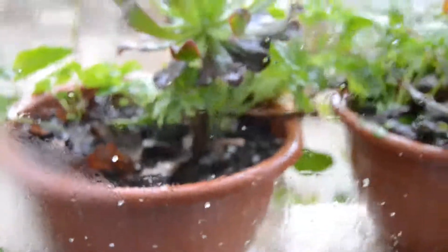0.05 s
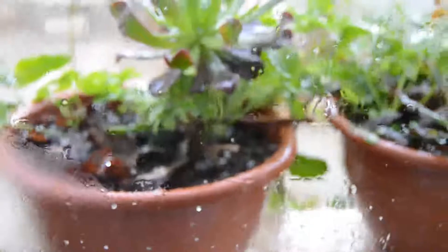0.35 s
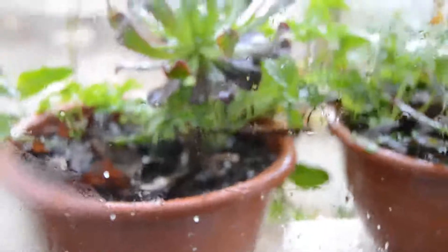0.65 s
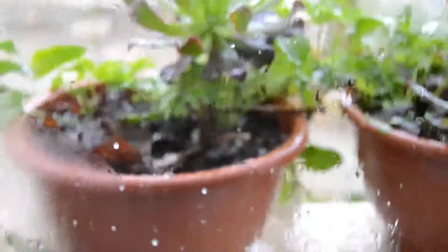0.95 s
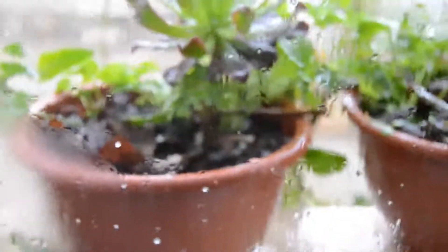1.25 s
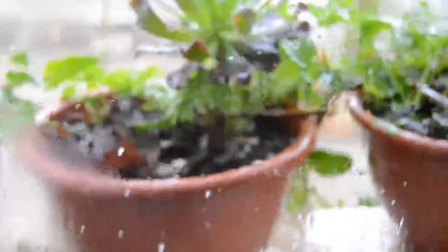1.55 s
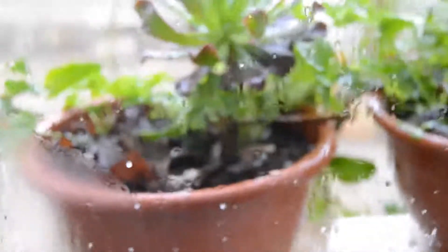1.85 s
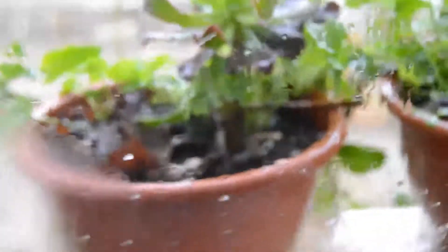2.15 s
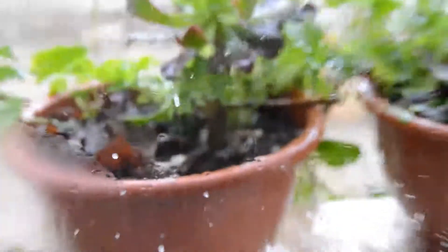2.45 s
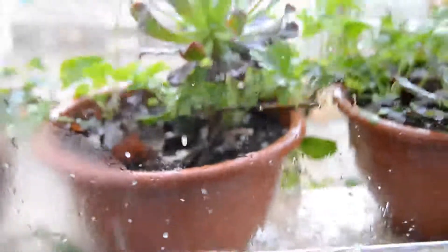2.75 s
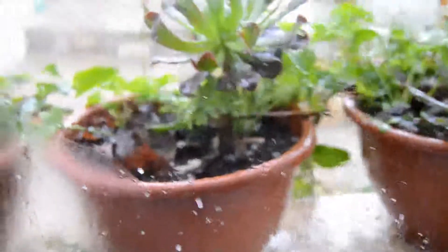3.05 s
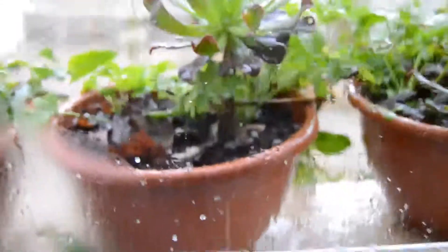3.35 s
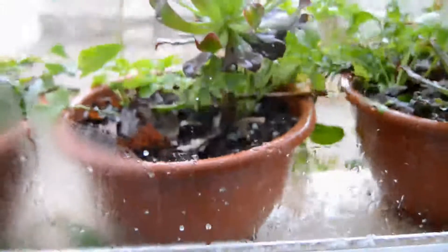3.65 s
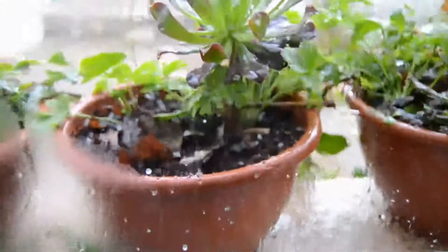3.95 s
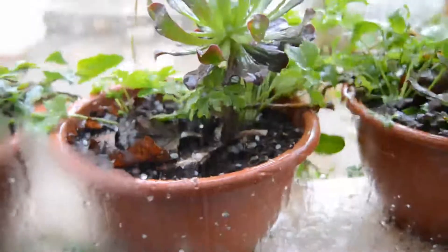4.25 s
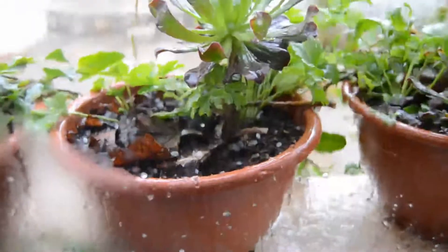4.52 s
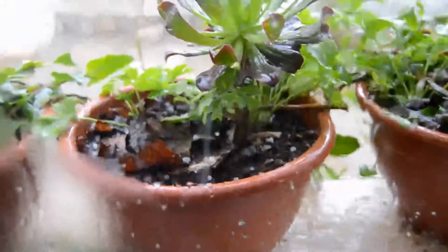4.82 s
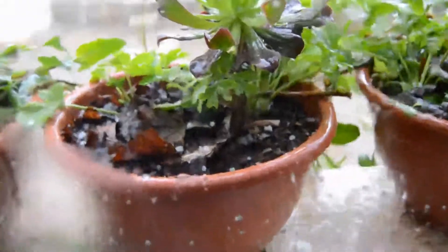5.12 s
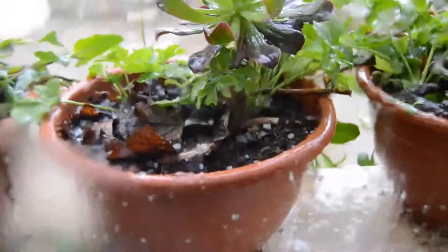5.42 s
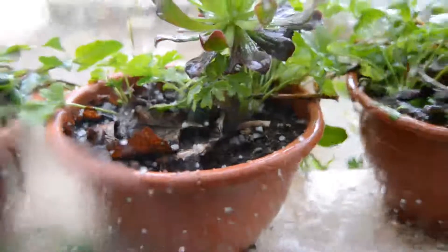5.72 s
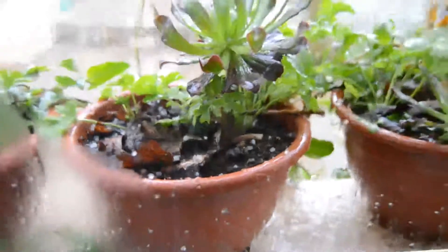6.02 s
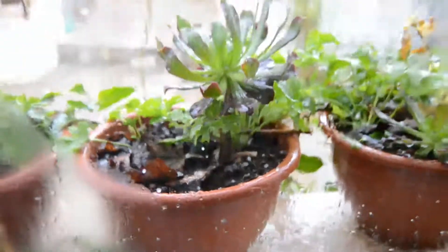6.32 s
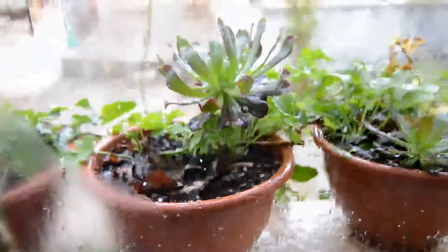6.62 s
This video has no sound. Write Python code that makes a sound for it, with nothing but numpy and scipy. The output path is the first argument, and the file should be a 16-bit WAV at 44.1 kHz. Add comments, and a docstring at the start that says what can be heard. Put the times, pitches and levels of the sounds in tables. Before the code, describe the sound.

Small hailstones tick and rap on plant pots and leaves close by, thickening in a gust over a steady hiss of distant hail.

```python
"""Small hail falls on potted plants on a sill, close by and just outside a window.
At first a few stones tick and rap on the pane, pots and leaves, over the hiss of far hail.
At 1.3 s a heavy stone knocks on a pot and rocks it; a faint, bright fizz follows. From 2 to 4 s a gust
brings the thickest hail: small stones patter, fine ice crackles and rims ring.
Then it thins to short flurries. All along, a wall and the yard answer the near hits with a brief echo."""
import sys
import numpy as np
from scipy import signal
from scipy.fft import rfft, irfft, next_fast_len
from scipy.io import wavfile
from scipy.ndimage import uniform_filter1d, map_coordinates

SR = 44100
rng = np.random.default_rng(int(sys.argv[2]) if len(sys.argv) > 2 else 0)


def to_wav(s):
    """Save 16-bit WAV."""
    ch = np.atleast_2d(s).T  # columns
    pcm = np.round(np.clip(ch, -1, 1) * 32767)  # PCM
    wavfile.write(sys.argv[1], SR, pcm.astype(np.int16))


N = 298998


# Big hailstones. Hardness is the bright tick and body the hollow knock, both compared with the rap.
# Life stretches the ring time. Columns: start_s, level_db, hardness_db, body_db, life_factor
BIG_STONES = [(0.023, -46.5, -3, -8, 0.89), (0.1549, -36, -24, -14, 0.44), (0.176, -43.5, -17.5, -17, 0.9),
              (0.196, -39, -0.5, 0.0, 1.3), (0.291, -47.5, 1, -4, 1.1), (0.448, -47.5, -8, -8, 0.87),
              (0.3942, -35.5, -11, -3.5, 1.4), (0.474, -44, 0, -14, 1.6), (0.5142, -42.5, -4.5, -5, 0.41),
              (0.8759, -36.5, -7.5, -9, 0.9), (0.902, -46, 5, 3, 1), (0.929, -37.5, -2, -12, 0.79),
              (0.995, -46, -22, -11, 0.4), (1.088, -45.5, 0, -13, 1.2), (1.128, -42, 4, 0, 1.2),
              (1.2347, -36.5, -10, -9, 1.0), (1.281, -38.5, -4, -9, 0.83), (1.3067, -31.5, -8.5, -6, 0.58),
              (1.384, -42, -12, -20.0, 1.4), (1.575, -47.5, 10.0, -7.0, 0.85),
              (1.8293, -40, -9.5, -13, 0.98), (1.8622, -30.5, -21, -10.5, 1.05), (1.879, -46, 5, 0, 0.8),
              (1.8945, -36.5, 8, -3, 0.93), (1.9502, -35.5, -7, -7, 1.2), (2.008, -40, -18, -3, 0.7),
              (2.022, -52, 8, -2, 1), (2.038, -54, 8, -2, 1), (2.07, -32, 7.5, -6.5, 0.72),
              (2.111, -44, 2, -10, 1.3), (2.1417, -41.5, -2, -2, 0.63), (2.179, -54, 8, -3, 0.8),
              (2.1926, -28.5, 0.5, 3, 1.1), (2.257, -36.5, -15.0, 1, 2.5), (2.2801, -22, 8.5, -6, 0.74),
              (2.2957, -35, -16, -19, 2.1), (2.3105, -26.5, -13, -10, 0.9), (2.336, -31, -1.5, -4, 1.1),
              (2.368, -41, -1, -2, 0.92), (2.406, -39, 1, 0, 1.2), (2.4183, -30.5, 1, -7, 1.5),
              (2.4448, -34, -16, -3, 2.3), (2.497, -46, 15, 10, 0.71), (2.52, -45, 7, 0, 1.1),
              (2.557, -36.5, 6, 1, 0.9), (2.589, -35, 6, 2, 0.93), (2.603, -30, 7, -5, 0.8),
              (2.6157, -36, 11.0, 2, 0.6), (2.6695, -26, 4.5, -0.5, 0.92), (2.6953, -35, 1, -2, 1.5),
              (2.705, -33, -5, -16, 1.7), (2.721, -30.5, -2, -7, 1.5), (2.7315, -31, -7, -11, 1),
              (2.7571, -27.5, 3, -2, 1.1), (2.7674, -23, 8, 1, 0.85), (2.7913, -29, 1, -4, 0.9),
              (2.808, -33.5, -10, -17.0, 0.7), (2.8513, -29.5, 3, 3, 0.72), (2.869, -41, 7, 0, 0.8),
              (2.879, -40.5, -1, 1, 0.65), (2.8903, -34, -7, -12, 0.96), (2.9227, -35.5, -2, -2, 0.97),
              (2.951, -45, -12, -6, 0.8), (2.962, -44, 6, 2, 0.9), (2.9909, -32, 0, -0.5, 0.84),
              (3.008, -34, 3, -4, 1.6), (3.018, -28, -12, -9, 0.87), (3.0426, -29, -1, -5.5, 0.96),
              (3.0602, -32.5, 12, 3, 1.3), (3.089, -27.0, -3.5, -1.5, 1.6), (3.1049, -34, -2, 0, 0.9),
              (3.13, -44, 2, -3, 0.99), (3.1839, -32, -24, -10.5, 0.91), (3.2308, -30, 6, 3, 1),
              (3.241, -37, 4, 0, 1.3), (3.2544, -34.5, 4, 1, 0.9), (3.262, -27.5, -7, -11, 0.75),
              (3.279, -34.5, 0, -10, 1.3), (3.2994, -36.5, 1, 6, 1), (3.346, -47, 13, -4, 0.8),
              (3.361, -30, -12, -12, 0.76), (3.3739, -43, 13, -8, 0.99), (3.4068, -34.5, -1, -3, 1.5),
              (3.4192, -38.5, -10, -11, 0.75), (3.4703, -36.5, -15, -15.0, 1.5),
              (3.4995, -34.5, -9, -14, 0.83), (3.505, -33.5, 2.5, -1, 1.2), (3.548, -42, -2, -19.0, 0.73),
              (3.5667, -33.0, -25, -12.5, 0.69), (3.5875, -41, 14, 4, 0.87),
              (3.6103, -36.5, -0.5, -3, 0.66), (3.704, -30, 4.5, -4, 0.87), (3.7392, -37.5, 7, -9.0, 0.47),
              (3.754, -36, -7, -18.0, 1.2), (3.762, -34.0, 7, 2, 0.91), (3.797, -41, 0, 5, 1.1),
              (3.8862, -36.5, 13, 7.5, 1.1), (3.945, -39, -4, 1, 1.7), (3.9536, -31, -3.5, -6, 0.79),
              (3.993, -39.5, 2.0, 2, 1.4), (4.0277, -37, 5.5, 1, 0.7), (4.043, -37, -6, -13, 0.5),
              (4.086, -42.5, 4, 0, 0.87), (4.124, -42.5, 10, 7, 0.84), (4.19, -49, -8, -8, 0.71),
              (4.213, -50, -14, -13, 0.67), (4.2326, -35, -5.5, -4.5, 0.69), (4.2765, -36.5, -7, -3, 0.55),
              (4.294, -35.5, 8, 1, 0.67), (4.3087, -37, -6, -4, 1.5), (4.334, -39, -7, -14.0, 1),
              (4.344, -40.5, 7.0, 0, 0.9), (4.399, -43, 3, 1, 1.4), (4.427, -42.5, -20, -8, 1.1),
              (4.442, -52, 8, -3, 0.8), (4.515, -55, 3, -4, 0.8), (4.563, -50.5, 1, 1, 0.8),
              (4.671, -46, -22, 1, 1), (4.682, -44, -21, -1, 1.1), (4.7115, -36.5, -20, 11, 1.3),
              (4.743, -42.5, 3, 4.5, 0.77), (4.776, -47, 0, -6, 1), (4.85, -42.5, 7, -3, 1.2),
              (4.863, -41, 4, 3, 1.9), (4.89, -48, 7, -2, 1), (4.906, -45, -11, -4, 0.8),
              (4.975, -45, 5, -4, 1.6), (4.919, -44.0, -5, -14, 1.9), (4.958, -44.5, 3, -8.0, 1.7),
              (5.0572, -35.5, -8.5, -16, 0.65), (5.113, -43.5, -5, -11.0, 1.7),
              (5.1524, -34, -10, -8, 0.96), (5.1715, -37, -2, -8, 1.2), (5.179, -34, -20, -8.5, 1),
              (5.3264, -40.5, 11, 16, 1.2), (5.352, -39, 1, -1, 0.69), (5.3844, -29, 0.5, -1.5, 0.85),
              (5.4104, -31, 11, -2, 1.2), (5.5194, -32, 2.5, -5, 0.76), (5.5593, -31.5, 6.5, -3.0, 1.25),
              (5.6146, -39.5, 6, 1, 1.7), (5.6547, -33, 1.5, 4, 0.81), (5.671, -37, 21.0, 4.0, 0.61),
              (5.702, -35.5, -11, 1, 1.8), (5.8081, -34.0, 9.5, -3, 0.95), (5.839, -43, -5, 3, 1),
              (5.918, -47, 0, 1, 1), (6.045, -50, 6, 0, 0.8), (6.06, -41, 7, 5, 1.4),
              (6.121, -45.5, 10, 3, 0.9), (6.0855, -37, -11, -11, 0.92), (6.1355, -23.5, 11, -2.5, 0.82),
              (6.235, -45.5, -12, -4, 1), (6.3614, -30.5, 13, -1, 0.76), (6.498, -44.5, -15.5, -17, 0.72),
              (6.587, -42, 17, 8, 1.6), (6.622, -39.5, 24, 6, 1.0), (6.6387, -33.0, 11.5, 9.5, 1.1),
              (6.6449, -37.5, -28, -8, 0.87), (6.673, -36.5, 25, -8, 0.7), (6.719, -42.5, 5, 6, 0.92),
              (6.74, -56, 9, -3, 0.8), (6.762, -41.5, 4, -6, 0.9)]

def near_stones():
    """Big stones land within reach, each with its own sharp crack."""
    start_s, level_db, hardness_db, body_db, life = np.transpose(BIG_STONES)
    band_db = band_levels(level_db, hardness_db, body_db)
    return impacts(start_s, band_db, life, contact_db=9, grit_db=2.5, colour_db=1.63)


def band_levels(level_db, hardness_db, body_db):
    """A stone shares its energy among four bands, from low to high: thud, knock, rap and tick."""
    thud_db = np.minimum(body_db, -2.5) - 18 + 5 * rng.standard_normal(len(level_db))
    parts_db = np.column_stack([thud_db, body_db, np.zeros_like(body_db), hardness_db])
    total_db = 20 * np.log10(np.linalg.norm(amp(parts_db), axis=1))
    return parts_db + (level_db - total_db)[:, None]


# Borders between thud, knock, rap and tick: pitch_hz
BAND_EDGES = [700, 2000, 5000]
# Time each band takes to fade by 60 dB when life is 1: ring_s
BAND_RING = [0.19, 0.1, 0.056, 0.041]
# The basic tone of a hit: pitch_hz, level_db
HIT_TONE = [(40, -35), (110, -33), (200, -15.5), (450, -9), (800, 1), (1500, 2), (2800, 7), (5000, -4.5),
            (7700, -10), (9400, -2), (10400, -12), (11000, -22.5), (11800, -20.5), (14000, -16)]
# Pitches that the struck surfaces boost or weaken: pitch_hz, width_hz, boost_db
RESONANCES = [(1510, 43, 5.5), (2250, 42, 6.5), (2844, 120, 3.5), (4300, 86, 4.5), (5660, 640, -1.5),
              (6600, 150, 3.5), (7110, 210, 7), (8200, 100, 3.5), (8730, 220, 1.5), (9420, 250, -2)]

def impacts(start_s, band_db, life, contact_db, grit_db, colour_db, size=4096):
    """Each stone is a gritty crack that rings briefly, coloured by the spot it strikes."""
    count = len(start_s)
    t, hz = np.arange(size) / SR, np.fft.rfftfreq(size, 1 / SR)
    # ice crushes in tiny uneven steps
    grit = np.repeat(rng.standard_normal((count, size // 16)), 16, axis=1)
    force = rng.standard_normal((count, size)) * amp(grit_db * grit)
    # first contact is one sharp spike, stronger in a hit that dies sooner
    force[:, SR // 2000] += amp(contact_db - 11 * np.log2(life) + 2 * rng.standard_normal(count))
    resonance_db = sum(db / (1 + (2 * (hz - pitch) / width) ** 2) for pitch, width, db in RESONANCES)
    spot = rng.standard_normal((count, len(hz)))
    spot = unit(uniform_filter1d(uniform_filter1d(spot, size=45), size=25))
    # a stone with a strong tick is hard, so its rap is brighter too
    tick_over_knock_db = band_db[:, 3:] - band_db[:, 1:2]
    tilt_db = 0.5 * np.clip(tick_over_knock_db + 11, -12, 12) * np.clip(np.log2((hz + 1) / 3000), -1, 1)
    # a leaf cushions the hit and takes off its highest treble
    softness_db = np.clip(band_db[:, 2:3] - band_db[:, 3:], 0, 12)
    cushion_db = 0.89 * softness_db * np.log2(np.maximum(hz / 5300, 1))
    crack = rfft(force) * amp(along(HIT_TONE, hz) + resonance_db + tilt_db - cushion_db + colour_db * spot)
    below_edge = [0 * hz] + [1 / (1 + (hz / edge) ** 10) for edge in BAND_EDGES] + [1 + 0 * hz]
    # the level holds while the stone shatters, then falls
    fading_s = np.maximum(t - 0.0015, 0)
    hits = np.zeros((count, size))
    for share, ring_s, db in zip(np.diff(below_edge, axis=0), BAND_RING, band_db.T):
        ring = irfft(crack * share) * amp(-60 * fading_s / (ring_s * life[:, None])) * rise(t, 0.00023)
        # a stone's level is its energy spread over 9.5 ms
        strength = np.linalg.norm(ring, axis=1, keepdims=True) / np.sqrt(0.0095 * SR)
        hits += ring / strength * amp(db)[:, None]
    at = np.round(start_s * SR).astype(int)[:, None] + np.arange(size)
    return np.bincount(at.ravel(), hits.ravel(), N)[:N]


def small_stones(count=120):
    """Light, short-ringing stones land at random, thicker and harder in the gusts."""
    gust = gust_db()
    fallen = np.cumsum(amp(1.2 * gust))
    at = np.searchsorted(fallen, rng.random(count) * fallen[-1])
    weight, hardness, body, ring = np.clip(rng.standard_normal((4, count)), -2, 2)
    level_db = shower_db().mean() + 3.5 + 0.83 * gust[at] + 2.5 * weight
    band_db = band_levels(level_db, hardness_db=5.5 + 1.4 * hardness, body_db=4 * body)
    return impacts(at / SR, band_db, life=0.55 * np.exp(0.08 * ring), contact_db=2, grit_db=1.5, colour_db=2)


# Heavy stones that hit a pot: start_s, level_db
KNOCKS = [(1.3064, -33.5), (1.68, -50), (2.258, -41.5), (2.408, -43), (2.418, -47), (5.703, -49.5)]
# The pot's own notes: pitch_hz, level_db, ring_s
POT_NOTES = [(200, -27, 0.15), (373, -2.5, 0.05), (499, 3, 0.028), (588, 2.5, 0.033), (770, 3, 0.025),
             (1010, 5, 0.03), (1316, 7, 0.024), (1456, -1, 0.04)]

def pot_knocks(push_hz=715, push_db=18.5, push_fade_s=0.0071):
    """A heavy stone pushes the pot's wall and sets it ringing; the soil inside soon damps it."""
    out, t = np.zeros(N + SR), np.arange(SR // 4) / SR
    push = np.sin(2 * np.pi * push_hz * t) * amp(push_db - 60 * t / push_fade_s) * rise(t, 0.00067)
    for start_s, level_db in KNOCKS:
        ring = sum(np.sin(2 * np.pi * hz * t) * amp(db + 2 * rng.standard_normal() - 60 * t / ring_s)
                   for hz, db, ring_s in POT_NOTES)
        out[round(start_s * SR):][:len(t)] += amp(level_db) * (push + ring * rise(t, 0.00095))
    return out[:N]


# The pot's hum after the hardest knock: start_s, pitch_hz, level_db, length_s
POT_HUM = (1.336, 590, -45, 0.018)

def pot_settles():
    """The rocked pot sits down gently, so just one note swells and fades."""
    start_s, pitch_hz, level_db, length_s = POT_HUM
    t = np.arange(N) / SR - start_s
    swell = np.sin(np.pi * np.clip(t / length_s, 0, 1))
    return amp(level_db) * swell * np.sin(2 * np.pi * pitch_hz * t)


# A fizz of ticks just after the loudest knock: start_s, end_s, level_db
TREBLE_FIZZ = (1.316, 1.356, -53)

def treble_fizz(count=9):
    """Faint, bright ticks come so close together that they make a brief fizz."""
    start_s, end_s, level_db = TREBLE_FIZZ
    tick_s = start_s + (end_s - start_s) * (np.arange(count) + rng.random(count)) / count
    tick_db = level_db + 1.5 * rng.standard_normal(count)
    band_db = band_levels(tick_db, hardness_db=np.full(count, 8.0), body_db=np.full(count, -3.0))
    return impacts(tick_s, band_db, life=np.full(count, 0.55), contact_db=10, grit_db=2.5, colour_db=2)


# Rims and stiff leaves set ringing by a stone: start_s, pitch_hz, level_db
RIM_PINGS = [(2.0712, 5570, -34), (2.0712, 9430, -26), (2.193, 1490, -41), (2.193, 3600, -27),
             (2.793, 9420, -32), (2.855, 886, -33), (3.018, 7140, -34), (3.47, 2180, -29.5),
             (3.567, 2156, -32), (3.705, 7200, -29), (3.954, 2260, -27.5), (4.682, 2290, -34),
             (4.713, 1645, -31), (4.714, 2150, -29.5), (5.153, 3510, -27.5), (5.153, 9450, -34.5),
             (5.173, 2530, -27), (5.327, 9300, -38), (6.137, 2800, -38), (6.235, 2080, -36.5)]

def pings(roughness=0.35):
    """A struck rim rings at two close pitches, made rough by the stone skittering on it."""
    out, t = np.zeros(N + SR), np.arange(SR // 4) / SR
    for start_s, pitch_hz, level_db in RIM_PINGS:
        ring_s = 0.05 * min(2000 / pitch_hz, 1) ** 0.38  # high pings die sooner
        twin_hz = pitch_hz * (1 + 0.02 * rng.standard_normal())
        skitter = unit(uniform_filter1d(rng.standard_normal((2, len(t))), size=70))
        ring = np.sin(2 * np.pi * pitch_hz * t + roughness * skitter[0])
        ring += 0.59 * np.sin(2 * np.pi * (twin_hz * t + rng.random()))
        ring *= 1 + roughness * skitter[1]
        out[round(start_s * SR):][:len(t)] += ring * amp(level_db - 60 * t / ring_s) * rise(t, 0.00065)
    return out[:N]


def thin_bass(x, cutoff_hz):
    """Leaves and pots are too small to push out deep bass."""
    return signal.sosfilt(signal.butter(2, cutoff_hz, "highpass", fs=SR, output="sos"), x)


# How long sound lingers in the yard: pitch_hz, ring_s
YARD_RING = [(200, 0.43), (2000, 0.42), (3800, 0.4), (5800, 0.27), (8500, 0.23), (9400, 0.17),
             (10500, 0.15)]

def yard(x, echo_db, tail_db, echo_s, places=5):
    """A wall throws back a smeared echo and the yard a short tail, different for each landing place."""
    out = np.zeros(N)
    place = np.arange(N) // 2048 % places  # the places take turns
    for k in range(places):
        hz, frame_s, noise = signal.stft(rng.standard_normal(SR // 2), SR, nperseg=256)
        tail = signal.istft(noise * amp(-60 * frame_s / along(YARD_RING, hz)[:, None]), SR, nperseg=256)[1]
        t = np.arange(len(tail)) / SR
        tail *= rise(t, 0.012)
        echo = rng.standard_normal(len(t)) * (t > echo_s) * amp(-60 * np.abs(t - echo_s) / 0.031)
        answer = amp(tail_db) * tail / np.linalg.norm(tail) + amp(echo_db) * echo / np.linalg.norm(echo)
        out += signal.fftconvolve(x * (place == k), answer)[:N]
    return out


# The tone of the finest ice nearby: pitch_hz, level_db
SPATTER_TONE = [(60, -18), (200, -2), (800, 2), (2800, 1), (5000, 2), (7200, -3), (7850, -22), (8500, 2.5),
                (9500, 1), (10600, -9.5), (11700, -27), (14000, -52)]

def spatter(full_crackle_db=8):
    """Fine ice lands nearby: an even wash in the lulls, separate clicks in the gusts."""
    crackle_share = np.clip(gust_db() / full_crackle_db, 0, 1)
    wash = np.sqrt(1 - crackle_share) * rng.standard_normal(N)
    crackle = np.sqrt(crackle_share) * grains(per_s=3000, spread_db=2.5)
    ice = filtered(wash + crackle, lambda hz: amp(along(SPATTER_TONE, hz)))
    return unit(ice) * amp(shower_db() - 0.5 + 1.8 * wobble(per_s=40))


# The tone of the far hail: pitch_hz, level_db
HISS_TONE = [(25, -28), (60, -23.5), (110, -17), (170, -11), (290, -11.5), (400, -9), (750, -5), (1150, -4),
             (1700, 0), (2500, 1.5), (3300, -3), (4900, -13), (9400, -23.5), (11500, -31.5)]

def far_hiss(level_db=-46.5):
    """Countless far hits merge into a steady hiss that swells only a little in a gust."""
    hiss = filtered(grains(per_s=30000, spread_db=0.44), lambda hz: amp(along(HISS_TONE, hz)))
    return patchy(hiss, depth_db=0.9) * amp(level_db + 0.18 * gust_db() + 0.59 * wobble(per_s=10))


# The shower's strength as gusts come and go: time_s, level_db
SHOWER_STRENGTH = [(0.0, -62.5), (0.38, -59.5), (0.64, -63), (1.77, -61.5), (2.23, -53), (2.91, -48.5),
                   (3.04, -49), (3.59, -52), (3.74, -56), (4.21, -55), (4.59, -60), (5.08, -56),
                   (5.38, -57), (5.53, -53), (5.83, -58.5), (6.61, -59.5), (6.78, -53)]

def shower_db():
    """The shower's strength at every sample."""
    return np.interp(np.arange(N) / SR, *np.transpose(SHOWER_STRENGTH))


def gust_db():
    """How far the shower rises above its average strength."""
    return shower_db() - shower_db().mean()


def grains(per_s, spread_db):
    """Tiny clicks of uneven size at random times."""
    lands = rng.random(N) < per_s / SR
    return unit(lands * rng.standard_normal(N) * amp(spread_db * rng.standard_normal(N)))


def patchy(x, depth_db):
    """The tone shifts from moment to moment as the mix of struck surfaces changes."""
    spectrum = signal.stft(x, nperseg=512)[2]
    patches = uniform_filter1d(rng.standard_normal(spectrum.shape), size=5, axis=0)
    patches = unit(uniform_filter1d(patches, size=7, axis=1))
    return unit(signal.istft(spectrum * amp(depth_db * patches), nperseg=512)[1][:N])


def amp(db):
    """Turn decibels into a gain."""
    return 10 ** (np.asarray(db) / 20)


def unit(x):
    """Scale to an average power of 1."""
    return x / np.sqrt(np.mean(x ** 2) + 1e-20)


def rise(t, rise_s):
    """A quick fade-in from 0 to 1."""
    return 1 - np.exp(-t / rise_s)


def along(points, hz):
    """Read between the rows of a (pitch_hz, value) table, spaced by octaves."""
    pitch_hz, values = np.transpose(points)
    return np.interp(np.log(hz + 1), np.log(pitch_hz + 1), values)


def wobble(per_s):
    """A smooth curve through per_s random points a second."""
    return map_coordinates(rng.standard_normal(int(N * per_s / SR) + 4), [np.arange(N) * per_s / SR])


def filtered(x, gain_at):
    """Turn each frequency up or down by gain_at(hz)."""
    size = next_fast_len(N + SR // 2)
    return irfft(rfft(x, size) * gain_at(np.fft.rfftfreq(size, 1 / SR)), size)[:N]


def scene():
    """Near hits and their echoes over the spatter and the far hiss, in mono."""
    hits = near_stones() + small_stones() + treble_fizz() + pot_knocks() + pot_settles() + pings()
    hits = thin_bass(hits, cutoff_hz=147)
    echoes = yard(hits, echo_db=-32, tail_db=-14.5, echo_s=0.012)
    return (hits + echoes + far_hiss() + spatter())[None]


def record(dry, top_hz=14700):
    """The treble is dulled above 11 kHz and silent past top_hz."""
    treble_drop = [(11000, -1), (11700, -21.5)]  # pitch_hz, level_db
    return filtered(dry[0], lambda hz: amp(along(treble_drop, hz)) * (hz < top_hz))[None]


dry = scene()
out = record(dry)
to_wav(out)
```